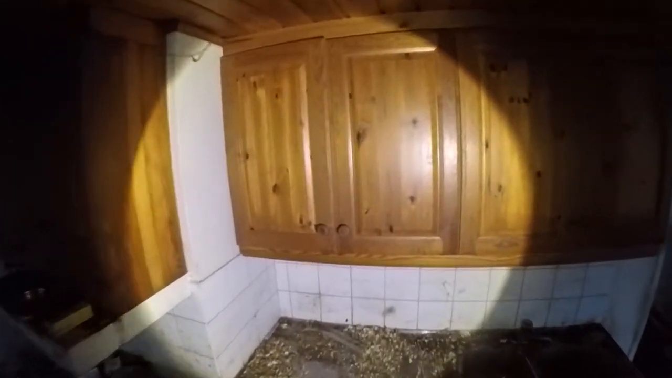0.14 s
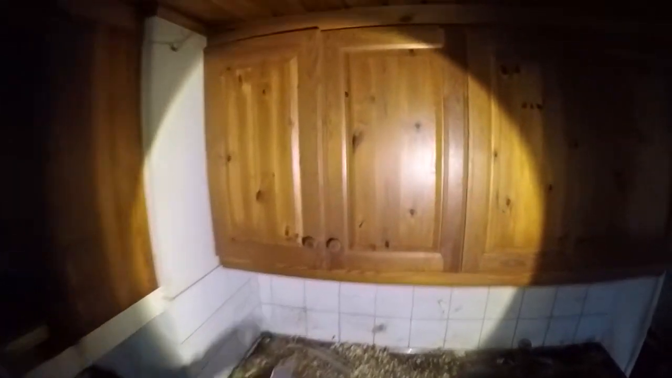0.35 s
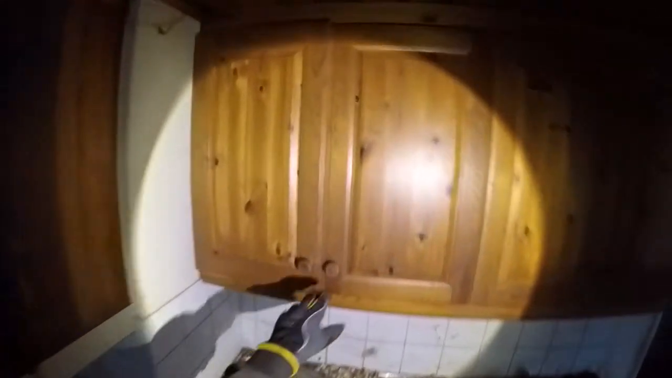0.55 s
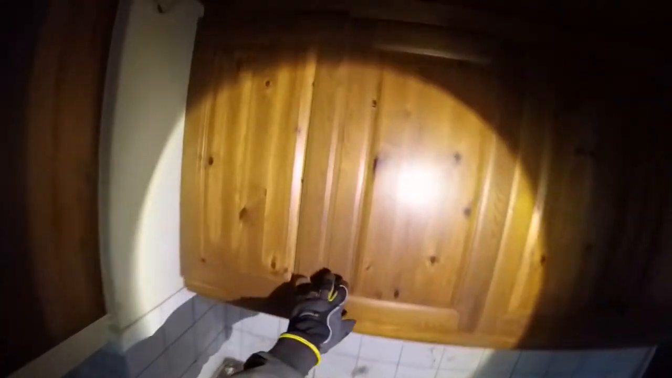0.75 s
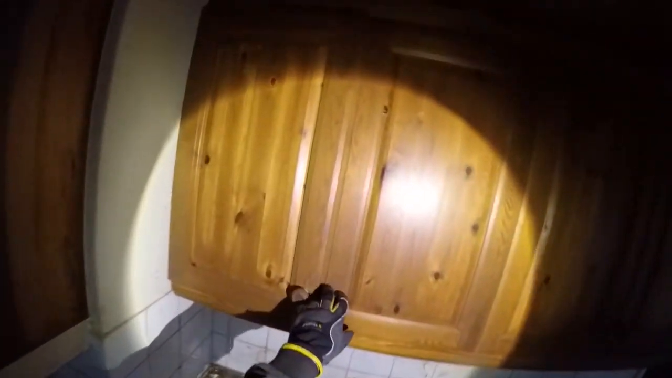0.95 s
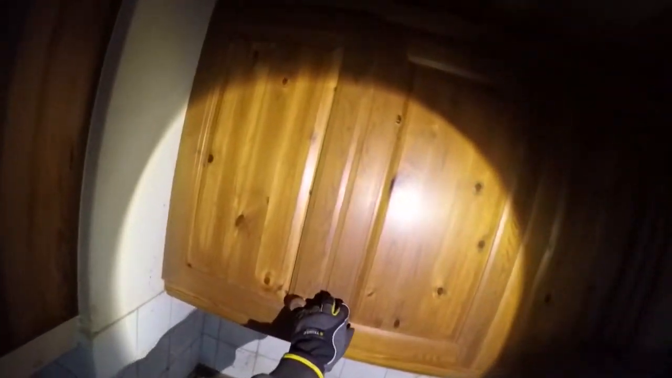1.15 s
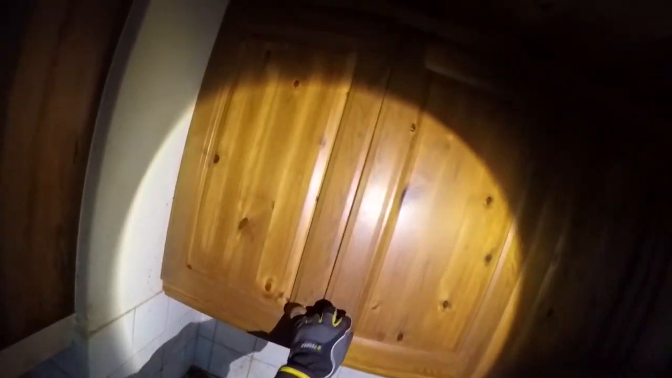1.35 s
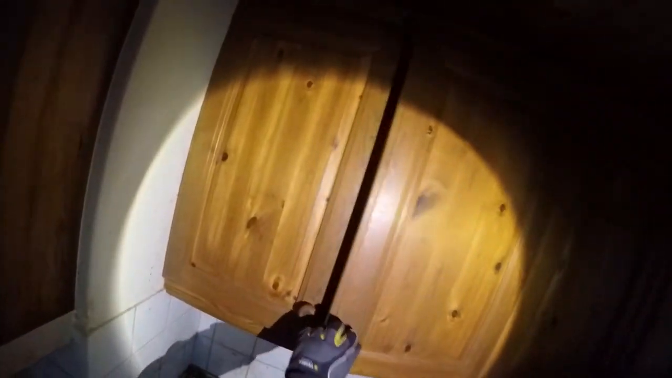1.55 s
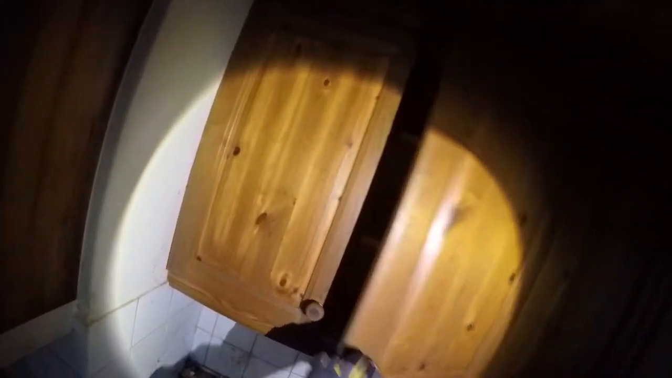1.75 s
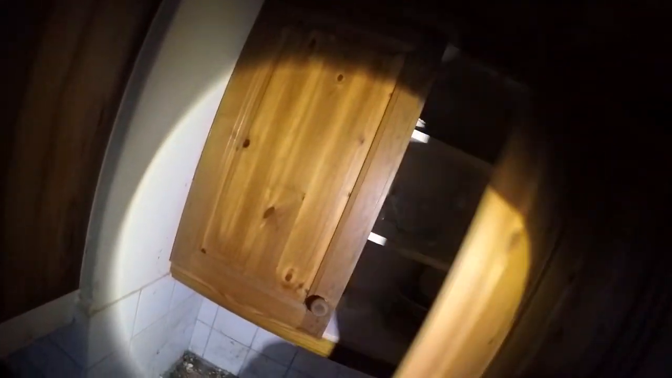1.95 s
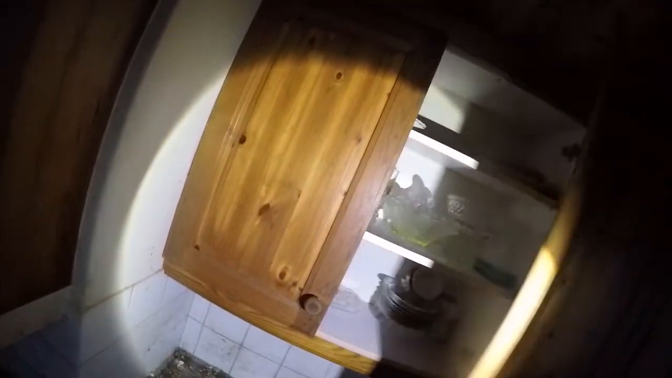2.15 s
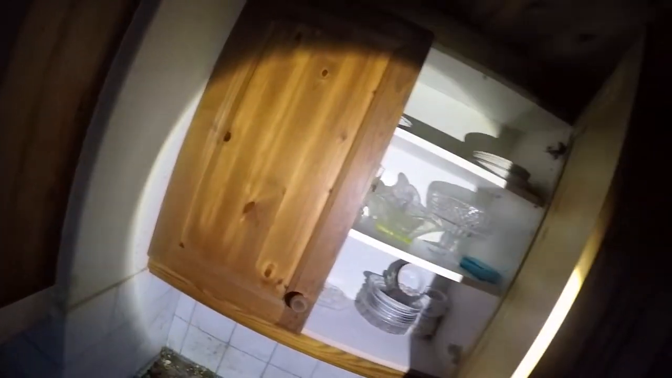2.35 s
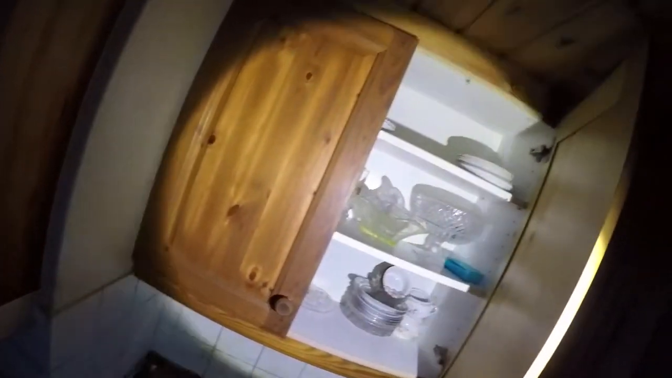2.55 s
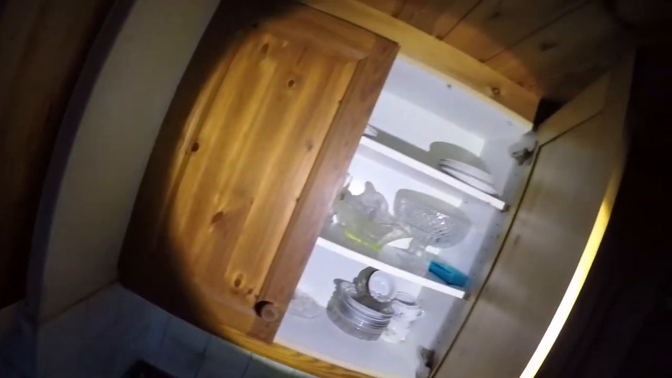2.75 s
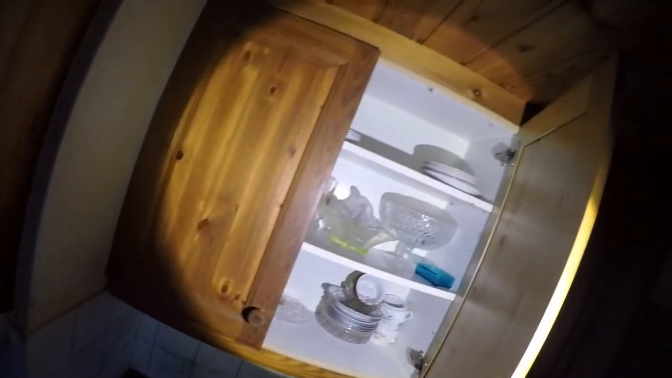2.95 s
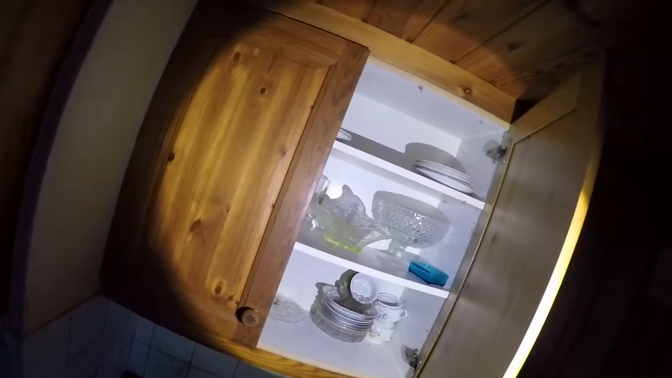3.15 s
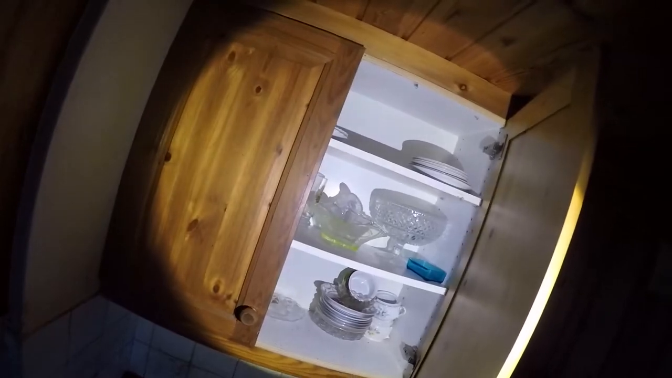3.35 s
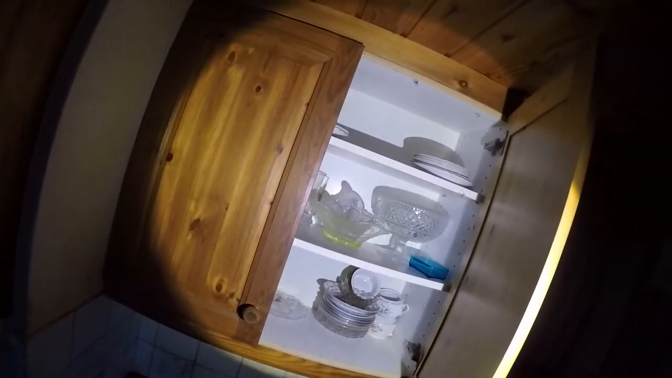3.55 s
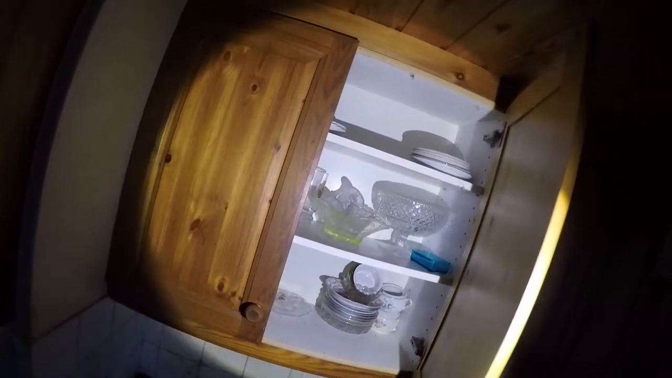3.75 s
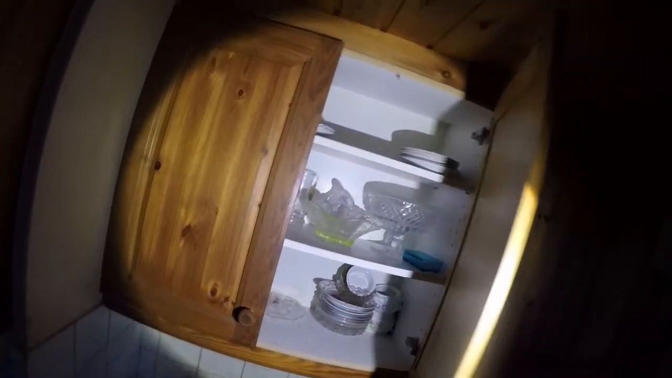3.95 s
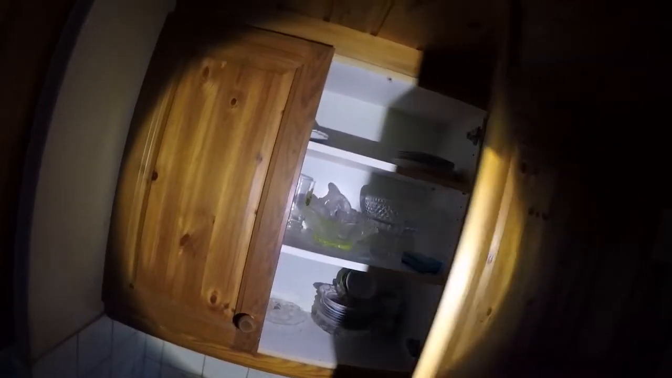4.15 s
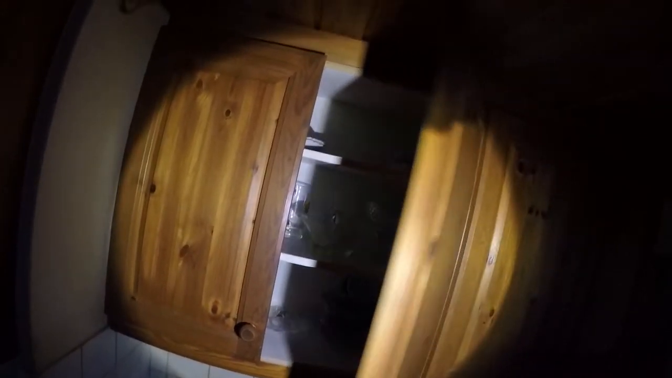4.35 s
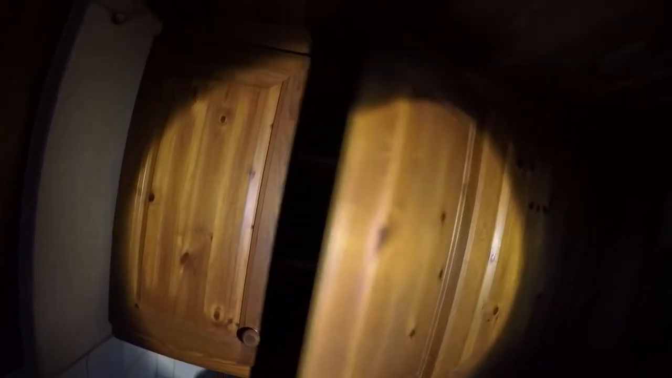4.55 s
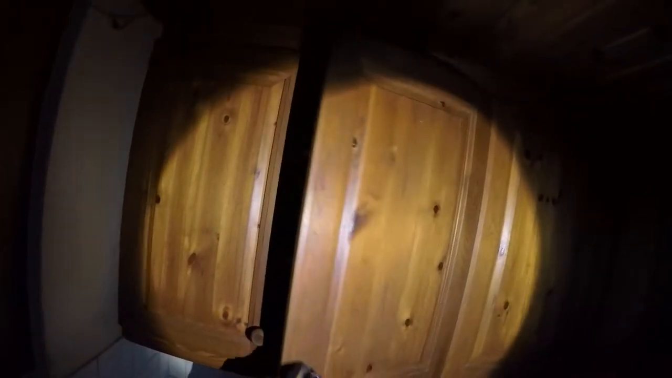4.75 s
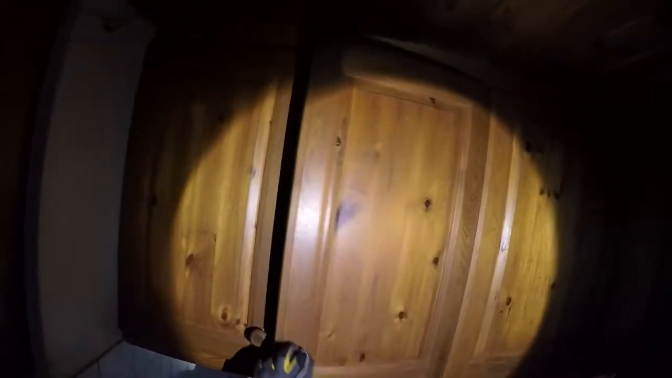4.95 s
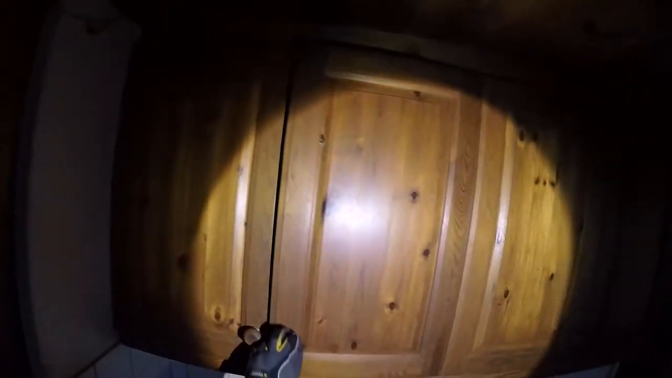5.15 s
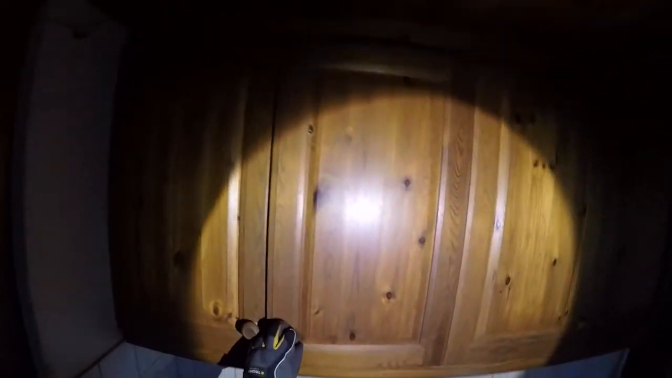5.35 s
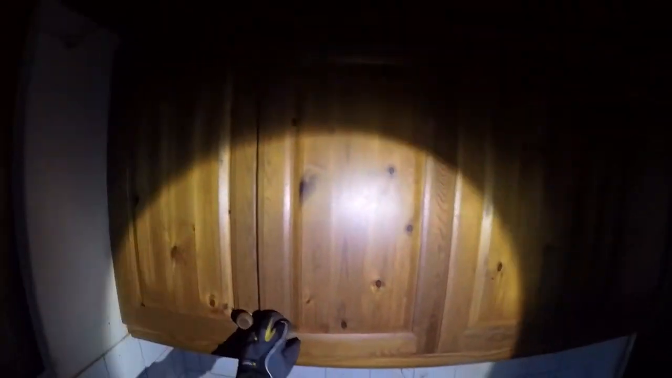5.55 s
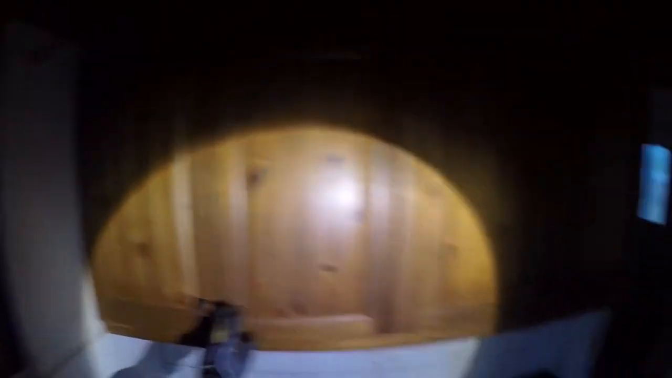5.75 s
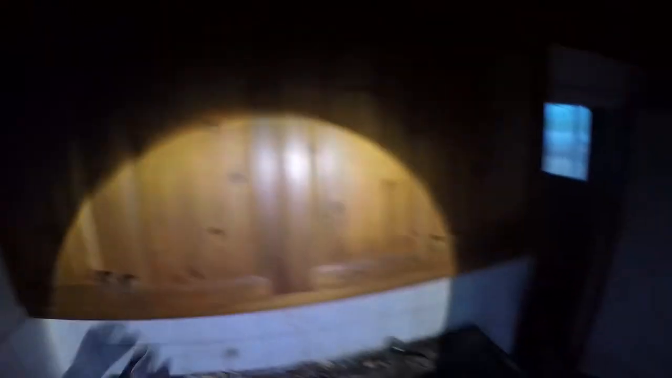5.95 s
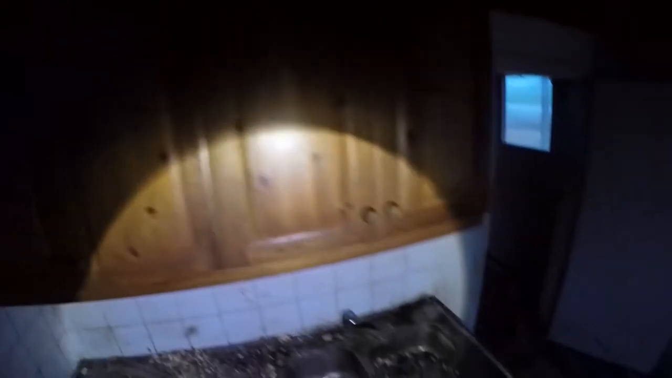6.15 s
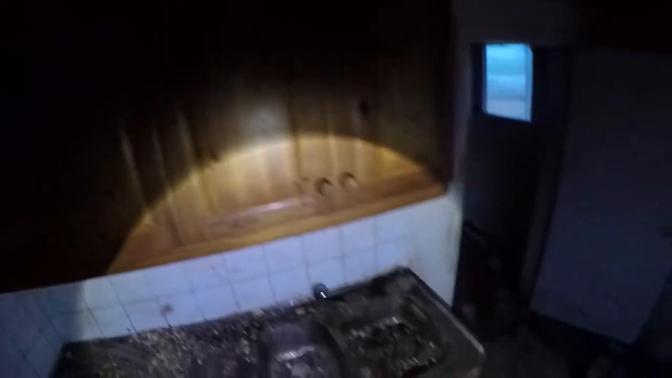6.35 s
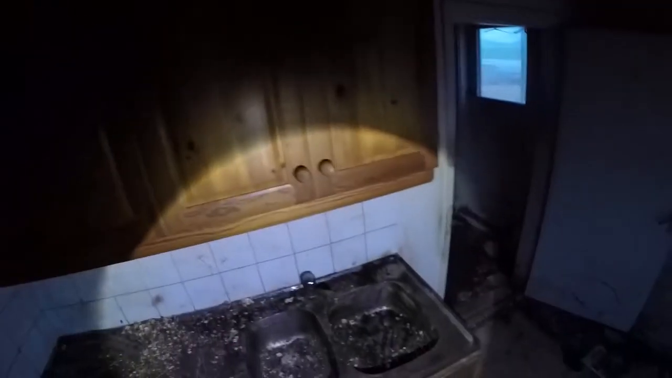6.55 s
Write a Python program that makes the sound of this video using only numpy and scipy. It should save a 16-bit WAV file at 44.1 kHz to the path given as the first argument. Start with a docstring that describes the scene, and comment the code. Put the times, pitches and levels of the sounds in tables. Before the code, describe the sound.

A still, empty house: faint hiss, low rumble and a hollow hum that sinks after the first second or so. A soft footfall comes at 0.2 s, a small hard click at 0.4, and barely audible ticks and another step around 0.9 to 1.1. At 1.34 s a tight wooden cupboard door grunts and scrapes in its frame with a crack, then breaks free at 1.5 with a loud, hollow double knock. Low rattling thumps shudder until about 2.2 over softly grinding hinges, fading as the swing slows; a faint metal snap marks its stop at 2.6. Quiet lasts until 5.1, when a soft step and a low puff of air lead into one solid, boxy knock at 5.2 and a slight settling scuff. Faint sleeve brushes follow from 5.65, with a tiny ting at 5.8 and a last soft step and click at 6.3. Close microphone, short room echo.

```python
"""A quiet, empty kitchen: a pine cupboard door heard from arm's length.
A gloved hand tugs it: it rubs in its frame, breaks free, shudders on its hinges and reaches its stop.
Later it is swung shut with one knock. Footfalls, clicks, a sleeve and a ting lie over faint hiss.
Wood and metal are noise bursts plus dying sines, the rub is stick-slip harmonics and grains,
and cloth, grinding hinges and the still house are shaped noise."""
import sys
import numpy as np
from scipy import signal
from scipy.fft import rfft, irfft
from scipy.io import wavfile
from scipy.ndimage import uniform_filter1d

SR = 44100
rng = np.random.default_rng(int(sys.argv[2]) if len(sys.argv) > 2 else 0)


def put_to_file(sound):
    """Save the sound as 16-bit audio at rate SR, in the file named by the first command-line argument."""
    columns = np.atleast_2d(sound).T  # one column per channel
    safe = np.clip(columns, -1, 1)
    whole_steps = np.round(safe * 32767)
    wavfile.write(sys.argv[1], SR, whole_steps.astype(np.int16))


N = 295381
TIME = np.arange(N) / SR
RING = np.arange(SR) / SR  # one second after a blow


def amp(db):
    """Decibels to gain."""
    return 10 ** (np.asarray(db) / 20)


def unit(x):
    """Scales to rms 1."""
    return x / np.sqrt(np.mean(x ** 2) + 1e-20)


def read(points, hz):
    """Interpolates a table's second column on a log-frequency axis."""
    f, value = np.transpose(points)
    return np.interp(np.log(hz + 1), np.log(f), value)


def add(mix, s, sound):
    """Mixes a sound in at time s."""
    part = mix[round(s * SR):][:len(sound)]
    part += sound[:len(part)]


def noise(spectrum, size, tilt_db=0):
    """Random-phase noise of rms 1 with a spectrum, tilted in dB per octave about 1 kHz."""
    hz = np.fft.rfftfreq(size, 1 / SR)
    octaves = np.log2(np.clip(hz, 150, 4500) / 1000)  # tilt stops outside these limits
    phase = np.exp(2j * np.pi * rng.random(len(hz)))
    gain = amp(read(spectrum, hz) + tilt_db * octaves)
    return unit(irfft(phase * gain, size))


def slow_wander(first_size, second_size):
    """Twice-smoothed noise of rms 1; window sizes in samples."""
    once = uniform_filter1d(rng.standard_normal(N), size=first_size)
    return unit(uniform_filter1d(once, size=second_size))


def stroke(s, hold, rise, fall):
    """An envelope that swells up to time s, holds, and dies away; all in seconds."""
    before = np.maximum(s - TIME, 0) / rise
    after = np.maximum(TIME - s - hold, 0) / fall
    return np.exp(-np.minimum(before + after, 30))


def mode(hz, db, t60):
    """One resonance, a sine falling 60 dB in t60 seconds."""
    return amp(db) * np.exp(-np.log(1000) * RING / t60) * np.sin(2 * np.pi * hz * RING)


def mode_bank(modes):
    """Sums modes with alternating sign, as neighbouring resonances answer a blow."""
    return sum((-1) ** k * mode(*row) for k, row in enumerate(modes))


# Kitchen decay. Each row: frequency in Hz, t60 in s.
ROOM_T60 = [(60, 0.49), (250, 0.47), (600, 0.52), (1500, 0.51), (2600, 0.47), (3600, 0.36), (6000, 0.39),
            (10000, 0.46)]


def die_away(x):
    """Each band fades at the kitchen's own pace."""
    hz, t, z = signal.stft(x, SR, nperseg=256)
    fade = np.exp(-np.log(1000) * t / read(ROOM_T60, hz)[:, None])
    return signal.istft(z * fade, SR, nperseg=256)[1][:len(x)]


def kitchen(x, wet_db):
    """Adds the diffuse echo of tiles and wooden walls, as decaying noise."""
    tail = die_away(rng.standard_normal(SR)) * (RING > .006)
    return x + amp(wet_db) * signal.fftconvolve(x, tail / np.linalg.norm(tail))[:N]


def burst(spectrum, tilt_db, decay, room_db, build, contact=0.00029):
    """A short crack of dense modes, then the room's duller answer building up behind it."""
    direct = noise(spectrum, SR, tilt_db + 0.31) * np.exp(-RING / decay)
    tail = die_away(noise(spectrum, SR, tilt_db - .6)) * (1 - np.exp(-RING / build))
    onset = 1 - np.exp(-(RING / contact) ** 2)
    return (direct + amp(room_db) * tail) * onset


# Still house with hiss. Each row: frequency in Hz, relative level in dB per Hz.
FLOOR_SPECTRUM = [(15, -36), (25, 2), (69, 3.5), (93, -8), (150, -6), (202, -17.5), (231, -14.5), (271, -9),
                  (354, -16), (604, -24), (655, -25.5), (1280, -23.5), (3540, -28.5), (9770, -38),
                  (15000, -41)]
# Hollow hum of the house. Each row: frequency in Hz, relative level in dB per Hz.
HOLLOW_SPECTRUM = [(40, -2.5), (200, -6), (226, 4), (238, 9), (252, 0), (290, -11), (600, -25), (1200, -16),
                   (2600, -21.5), (4000, -33), (9000, -42)]
FLOOR_DB = -63.5
HOUSE_EXTRA_DB, HOUSE_HOLD_S, HOUSE_FADE_S, HOUSE_STEADY_DB = -65.5, 1.15, 0.27, -76
WHINE_HZ, WHINE_WIDTH_HZ, WHINE_DB = 9690, 170, -92.5


def background():
    """The still house, a hollow hum that sinks to a steady level, and hiss with a thin whistle."""
    off_hz = np.fft.rfftfreq(N, 1 / SR) - WHINE_HZ
    whine = unit(irfft(rfft(rng.standard_normal(N)) / (1 + (off_hz / WHINE_WIDTH_HZ) ** 2), N))
    extra = amp(HOUSE_EXTRA_DB) * stroke(0, HOUSE_HOLD_S, rise=1, fall=HOUSE_FADE_S)
    house = amp(HOUSE_STEADY_DB) + extra
    return amp(FLOOR_DB) * noise(FLOOR_SPECTRUM, N) + house * noise(HOLLOW_SPECTRUM, N) + amp(WHINE_DB) * whine


# Soft footfalls. Each row: start in seconds, level in dB.
STEPS = [(0.214, -45.5), (1.06, -51), (5.134, -50.5), (5.657, -54.5), (6.315, -54)]
# Footfall colour. Each row: frequency in Hz, relative level in dB per Hz.
STEP_SPECTRUM = [(30, -15), (70, 12.5), (190, 10.5), (300, -7), (500, -6.5), (900, -46), (4000, -72)]


def footfalls():
    """Soft low noise bursts with a slow contact."""
    out = np.zeros(N)
    for s, db in STEPS:
        step = burst(STEP_SPECTRUM, 0, decay=0.044, room_db=-14, build=0.018, contact=0.0018)
        add(out, s, amp(db) * step)
    return out


# Hard clicks of knob and things nearby. Each row: start in seconds, level in dB, tilt in dB per octave.
CLICKS = [(.3757, -38, 0.5), (0.9121, -59, 6), (0.9556, -69.5, 13.5), (6.31, -67, 0)]
# Click colour. Each row: frequency in Hz, relative level in dB per Hz.
CLICK_SPECTRUM = [(59, -18), (100, -3.5), (175, -1.5), (326, -10), (390, -4), (560, -13.5), (644, -19.5),
                  (1060, -13), (1220, -16), (1790, -10), (2470, -10), (3470, -26), (4680, -25), (8040, -50),
                  (12000, -54), (15600, -80), (22000, -120)]
# Brief ring at a click's start. Each row: frequency in Hz, relative level in dB, t60 in s.
TICK_MODES = [(1500, -2.5, 0.014), (1840, 1.5, 0.017), (2085, -2.5, 0.055)]


def clicks():
    """Small hard contacts: a noise crack plus a few fast-dying modes."""
    out = np.zeros(N)
    tick = mode_bank(TICK_MODES)
    for s, db, tilt_db in CLICKS:
        crack = burst(CLICK_SPECTRUM, tilt_db, decay=0.004, room_db=-5.5, build=0.0052)
        add(out, s, amp(db) * (tick + crack))
    return out


# Dense upper modes of the wood. Each row: frequency in Hz, relative level in dB per Hz.
WOOD_SPECTRUM = [(30, -2.5), (120, 20), (300, 18), (500, 11), (850, 6), (1400, 0), (2050, 3), (2800, 1.5),
                 (3400, -10), (4700, -12.5), (6500, -25), (7800, -40), (11000, -36.5), (15000, -47.5)]


def clack(db, tilt_db, contact):
    """The crack of wood on wood, duller for a longer contact in seconds."""
    crack = burst(WOOD_SPECTRUM, tilt_db, decay=0.0087, room_db=-10, build=0.0046, contact=contact)
    return amp(db) * crack


RUB_S, RUB_HOLD_S, JUDDER_DB, SLIPS_SLACK_HZ, SLIPS_PULLED_HZ = 1.335, .046, -24.5, 155, 203.8
SCRAPE_S, SCRAPE_HOLD_S, SCRAPE_DB, CREEP_DB = 1.348, .02, -35, -52.5
SNAGS_PER_S = 500


def rub():
    """The tight edge sticks and slips, faster with pull: a wooden grunt and a dry, grainy scrape."""
    wander, grip = slow_wander(150, 60), slow_wander(150, 60)
    pull = stroke(RUB_S, RUB_HOLD_S, rise=.0055, fall=.01)
    slips_hz = SLIPS_SLACK_HZ + (SLIPS_PULLED_HZ - SLIPS_SLACK_HZ) * pull
    turns = np.cumsum(slips_hz * (1 + 0.054 * wander)) / SR
    harmonics = sum(np.sin(2 * np.pi * k * turns) / k ** 3 for k in range(1, 5))
    judder = unit(harmonics * 1.0) * amp(2.5 * grip)
    # fibres of the edge catch and let go
    snags = rng.standard_normal(N) * (rng.random(N) < SNAGS_PER_S / SR)
    grain = burst(WOOD_SPECTRUM, 0.16, decay=0.0066, room_db=-25.0, build=.01)
    scrape = unit(signal.fftconvolve(snags, grain)[:N])
    sliding = amp(SCRAPE_DB) * stroke(SCRAPE_S, SCRAPE_HOLD_S, rise=0.0077, fall=0.011)
    creeping = amp(CREEP_DB) * stroke(RUB_S, RUB_HOLD_S, rise=.035, fall=.01)
    return kitchen(amp(JUDDER_DB) * pull * judder + (sliding + creeping) * scrape, wet_db=-6.5)


CONTACT_S, THUMP_SWELL_S = 0.001, 0.011  # build-up of a blow's crack and of its thump
# Panel modes. Each row: frequency in Hz, relative level in dB hanging free,
# relative level in dB seated in the frame, t60 in s.
PANEL_MODES = [(157.1, -12.5, -7.5, 0.35), (176.6, -3, -16, 0.26), (200.6, -2, 4, 0.16),
               (215.3, -4, -25, .25), (263.4, 2.5, -27, 0.2), (284.1, -3, -8, 0.42),
               (314.4, -10, -3.5, 0.37), (335.4, -8.5, -10.5, 0.33), (359, -8, -23, 0.42),
               (400.4, -10, -17, 0.41), (421, -31.5, -6, 0.38), (436, -26, -15, .28),
               (476.6, -16, -31.5, 0.54), (524, -22.5, -16, .25), (602, -15, -29, 0.26),
               (636, -20.5, -19.5, .25), (725, -18.5, -16, 0.22), (776, -14, -19, 0.12),
               (815, -25.5, -19, .26), (920, -22, -26, 0.18), (1028, -17.5, -36, 0.19),
               (1170, -23.5, -20.5, 0.18), (1300, -28, -25, 0.15), (1495, -25.5, -48, 0.083),
               (1737, -25.5, -34, 0.37), (2085, -25.5, -30, 0.32), (2416, -31.5, -43.5, 0.64),
               (2746, -25, -36, 0.4)]


def panel(seated):
    """The panel's modes ring, hanging free or seated in the frame."""
    modes = [(hz, shut_db if seated else free_db, t60) for hz, free_db, shut_db, t60 in PANEL_MODES]
    return .5 * mode_bank(modes) * (1 - np.exp(-RING / CONTACT_S))


def thump(db, hz, swell):
    """A low push of the cupboard's box: a sine that peaks after swell seconds."""
    return amp(db) * RING / swell * np.exp(1 - RING / swell) * np.sin(2 * np.pi * hz * RING)


# Hard blows of door on frame. Each row: start in seconds, clack level in dB, clack tilt in dB per octave,
# panel ring gain in dB, thump level in dB, thump pitch in Hz.
KNOCKS = [(1.3447, -24.5, -0.6, -33, -51.5, 81), (1.36, -23, -4, -26.5, -30, 70),
          (1.4890, -35, 7.5, -15.5, -10.5, 101.2), (1.4990, -17.3, 0.7, -24, -24, 55.2),
          (5.1848, -31, 0, -37, -32.5, 59.3), (5.1902, -24, -3.5, -17, -19.5, 73),
          (5.2012, -49, -1.5, -33.5, -17.5, 108)]
SEATED_FROM_S = 5
SETTLE_S, SETTLE_DB, SETTLE_TILT_DB_PER_OCTAVE = 5.226, -37.5, 1


def knocks():
    """Each blow clacks, rings the panel and thumps the box; the shut door settles with a soft scuff."""
    clacks, rings, thumps = np.zeros((3, N))
    free, shut = panel(False), panel(True)
    for s, clack_db, tilt_db, ring_db, thump_db, thump_hz in KNOCKS:
        add(clacks, s, clack(clack_db, tilt_db, CONTACT_S))
        add(rings, s, amp(ring_db) * (shut if s > SEATED_FROM_S else free))
        add(thumps, s, thump(thump_db, thump_hz, THUMP_SWELL_S))
    add(clacks, SETTLE_S, clack(SETTLE_DB, SETTLE_TILT_DB_PER_OCTAVE, contact=.01))
    return clacks + kitchen(rings, wet_db=-13) + kitchen(thumps, wet_db=-11)


BOUNCE_S, BOUNCE_SHRINK, BOUNCE_DB, BOUNCE_STEP_DB = .023, .6, 2.5, -1


def chatter(count):
    """A bright tick, then duller bounces, each sooner and weaker than the bounce before."""
    out, s, gap = clack(-4, tilt_db=3, contact=.0007), 0, BOUNCE_S
    for k in range(count):
        s, gap = s + gap, gap * BOUNCE_SHRINK
        add(out, s, clack(BOUNCE_DB + k * BOUNCE_STEP_DB, tilt_db=.5, contact=0.0019))
    return out


# Jolts of the swinging door, the last at its stop. Each row: start in seconds, rattle gain in dB,
# thump level in dB, hum gain in dB, hum pitch in Hz.
JOLTS = [(1.53, -42.5, -40, -31.5, 92.8), (1.6338, -38, -18, -44.5, 90), (1.778, -39, -17.5, -21, 96),
         (1.889, -47, -33.5, -23.5, 96.4), (2.052, -59, -32.5, -31, 98.3), (2.165, -67, -43, -37.5, 98),
         (2.600, -69, -37, -38.5, 77.4)]
# Slow bending of the free door. Each row: ratio to its lowest mode, relative level in dB, t60 in s.
BENDING_MODES = [(1, 5.5, 0.46), (1.672, -6, 0.34), (2.921, -30.5, 0.82)]
JOLT_THUMP_RATIO, JOLT_RING_DB = .88, 10  # thump pitch over hum pitch; panel ring gain in the rattle


def shudder():
    """At each jolt the freed door rattles, thumps, then flexes on its hinges and hums."""
    out, thumps = np.zeros((2, N))
    ring = amp(JOLT_RING_DB) * panel(False)
    for s, rattle_db, thump_db, hum_db, hz in JOLTS:
        flex = sum(mode(hz * ratio, mode_db, t60) for ratio, mode_db, t60 in BENDING_MODES)
        hum = flex * (1 - np.exp(-RING / 0.012))
        add(out, s, amp(rattle_db) * (chatter(count=2) + ring) + amp(hum_db) * hum)
        add(thumps, s, thump(thump_db, JOLT_THUMP_RATIO * hz, swell=.011))
    return out + kitchen(thumps, wet_db=-7)


# Grinding hinges. Each row: frequency in Hz, relative level in dB per Hz.
GRIND_SPECTRUM = [(60, 12), (170, 6.5), (360, 3), (550, -14.5), (1300, -16), (2700, -13), (3400, -29),
                  (6500, -27.5), (8000, -40.5), (15000, -44)]
SWING_S, SWING_HOLD_S, SWING_DB, SWING_SLOWING_DB_PER_S = 1.74, 0.46, -50, -14
# Metal snap at the stop. Each row: frequency in Hz, relative level in dB per Hz.
SNAP_SPECTRUM = [(100, 1), (250, -6), (520, -2), (780, 1), (1000, -0.5), (1300, -10), (1680, -2),
                 (2000, -2), (2520, 2.5), (2850, 0.5), (3200, -30), (4200, -10), (5200, -24), (7000, -32),
                 (12000, -47)]
# Hinge resonances. Each row: frequency in Hz, relative level in dB, t60 in s.
HINGE_MODES = [(764, -8, 0.13), (1003, -2, 0.078), (1690, -3, 0.072), (2100, -13, 0.12), (2460, -13.5, 0.2)]
# Box thumps behind the snap. Each row: pitch in Hz, level in dB, swell in s.
STOP_BOX = [(91.5, -35, .004), (46.3, -45, 0.041)]
STOP_S, STOP_DB, STOP_LAG_S = 2.5795, -48, 0.0063


def hinges():
    """Hinges grind, less as the swing slows, snap at their stop, and pass the blow to the box."""
    slowing = amp(SWING_SLOWING_DB_PER_S * (TIME - SWING_S))
    speed = stroke(SWING_S, SWING_HOLD_S, rise=.05, fall=0.17) * slowing
    out = amp(SWING_DB) * speed * noise(GRIND_SPECTRUM, N)
    crack = burst(SNAP_SPECTRUM, 0, decay=0.012, room_db=-10.0, build=0.0087)
    snap = crack + amp(-1) * mode_bank(HINGE_MODES)
    add(out, STOP_S, amp(STOP_DB) * snap)
    add(out, STOP_S + STOP_LAG_S, sum(thump(db, hz, swell) for hz, db, swell in STOP_BOX))
    return out


CUSHION_S, CUSHION_HOLD_S, CUSHION_DB, CUSHION_HZ = 5.1516, .033, -40.5, 76.4


def air_cushion():
    """Air squeezed out of the closing cupboard booms: a low sine swelling just before the door lands."""
    squeeze = stroke(CUSHION_S, CUSHION_HOLD_S, rise=.01, fall=.009)
    return amp(CUSHION_DB) * squeeze * np.sin(2 * np.pi * CUSHION_HZ * (TIME - CUSHION_S))


# Brushes of sleeve and glove. Each row: start in seconds, hold in seconds, level in dB.
BRUSHES = [(5.653, 0.052, -59), (5.795, 0.048, -59), (6.129, 0.33, -71.5), (6.537, 0.045, -67)]
# Cloth colour. Each row: frequency in Hz, relative level in dB per Hz.
CLOTH_SPECTRUM = [(100, 16), (700, -3.5), (1500, -7.5), (2700, -1), (3600, -13), (6300, -12.5),
                  (8000, -30.5), (14500, -21)]
BRUSH_RISE_S, BRUSH_FALL_S, FOLD_SWING_DB = 0.027, 0.066, 2.8


def sleeve():
    """Cloth noise in short strokes, its level wandering with the folds."""
    folds = slow_wander(500, 300)
    strokes = sum(amp(db) * stroke(s, hold, BRUSH_RISE_S, BRUSH_FALL_S) for s, hold, db in BRUSHES)
    return strokes * amp(FOLD_SWING_DB * folds) * noise(CLOTH_SPECTRUM, N)


# Small ringing thing. Each row: frequency in Hz, relative level in dB, t60 in s.
TING_MODES = [(951, 1.5, 0.75), (1156, 2.5, 0.14), (708, 1.5, 0.12), (2085, 1, 0.078), (2750, -6, 0.054)]
TING_S, TING_DB = 5.775, -72.5


def ting():
    """The hand brushes something small: a soft noise stroke drives its faint modes."""
    out = np.zeros(N)
    brush = rng.standard_normal(SR) * np.exp(-((RING - .04) / 0.056) ** 2)
    ring = np.zeros(SR)
    for hz, db, t60 in TING_MODES:
        ring += amp(db) * unit(signal.fftconvolve(brush, mode(hz, 0, t60))[:SR])
    add(out, TING_S, amp(TING_DB) * unit(ring))
    return out


def scene():
    """The quiet, the door and the small sounds around it, in one channel."""
    door = rub() + knocks() + shudder() + hinges() + air_cushion()
    small_sounds = footfalls() + clicks() + sleeve() + ting()
    return (background() + door + small_sounds)[None]


CEILING, EDGE_HZ = .39, 15050


def record(dry):
    """The recorder rounds off the highest peaks, then limits the band."""
    held = dry / (1 + (dry / CEILING) ** 10) ** (1 / 10)
    lowpass = signal.firwin(511, EDGE_HZ, window=("kaiser", 9), fs=SR)
    return signal.oaconvolve(held, lowpass[None], "same")


dry = scene()
out = record(dry)
put_to_file(out)
```